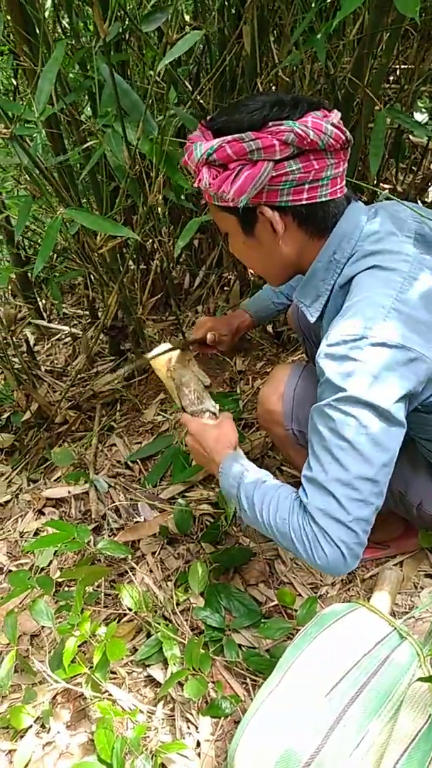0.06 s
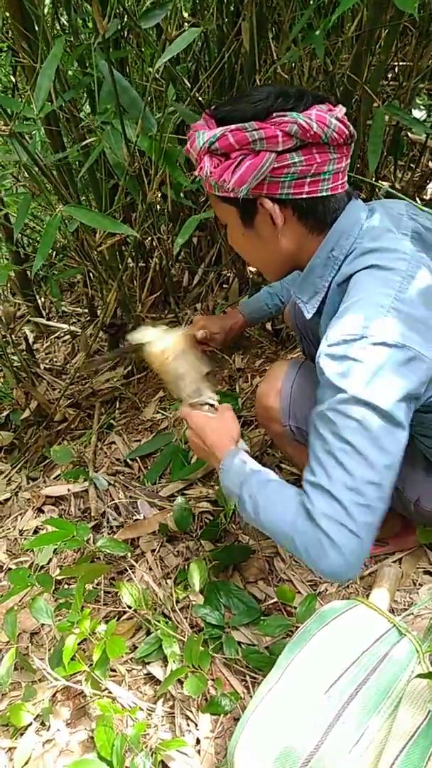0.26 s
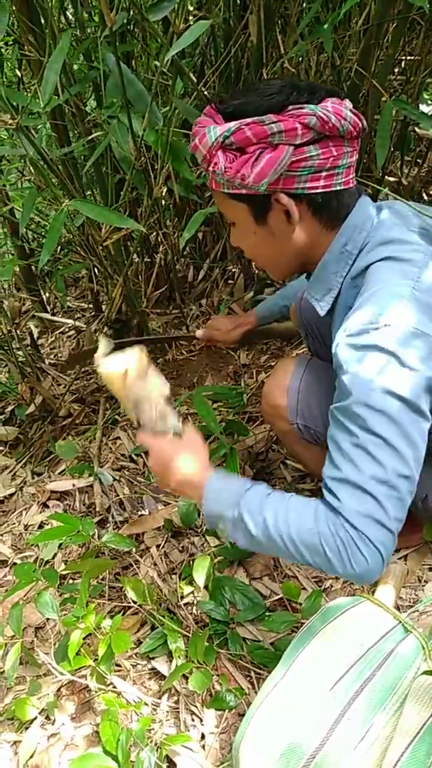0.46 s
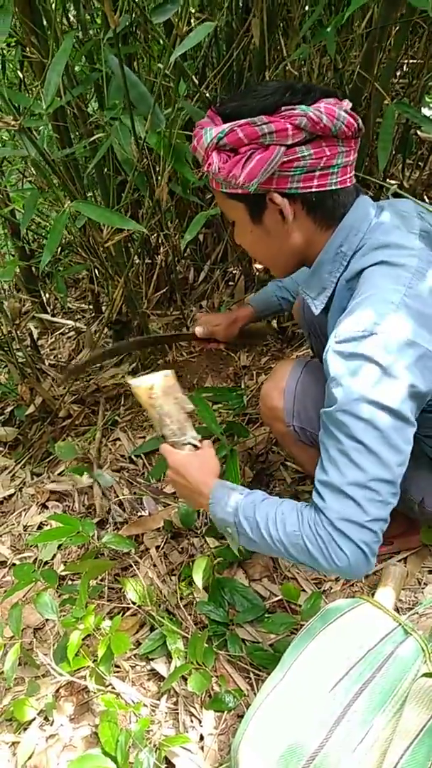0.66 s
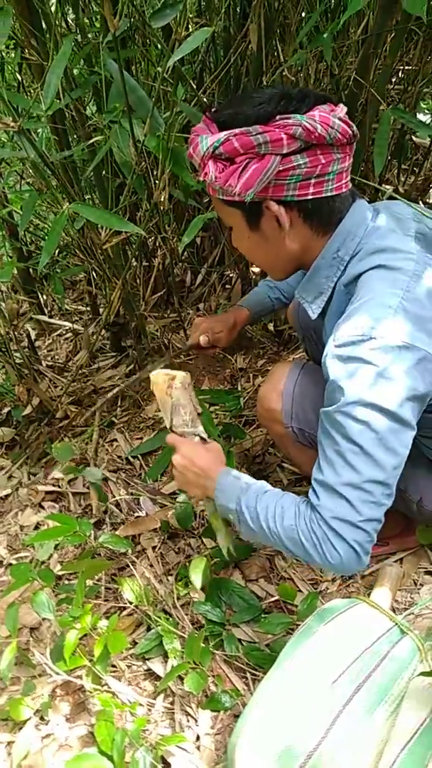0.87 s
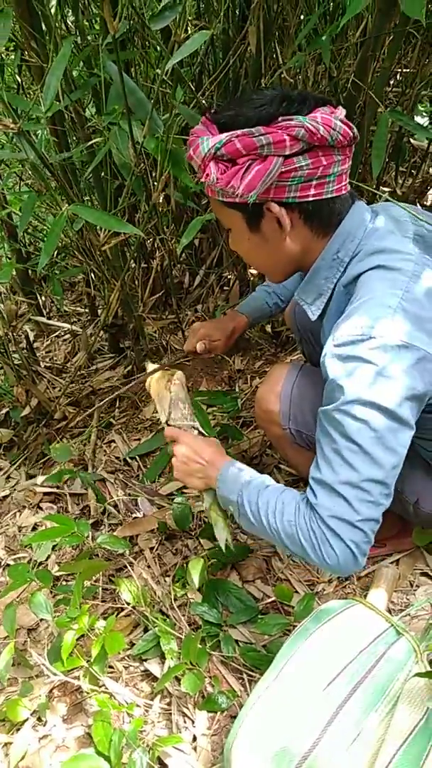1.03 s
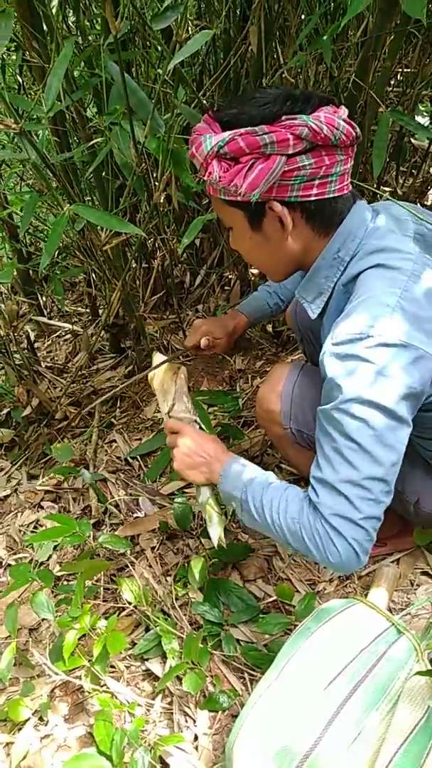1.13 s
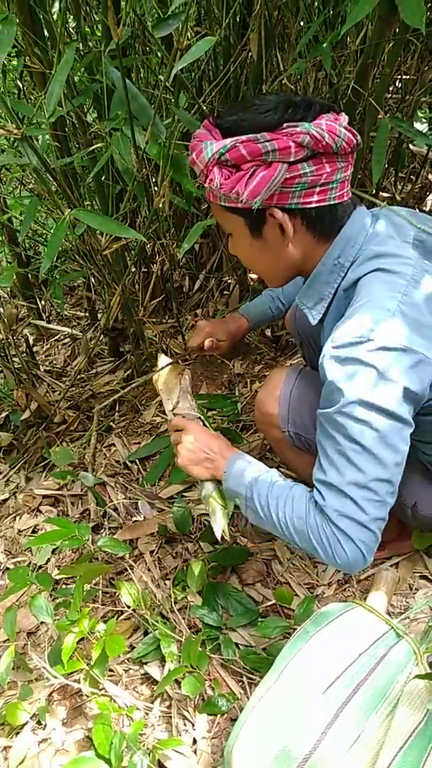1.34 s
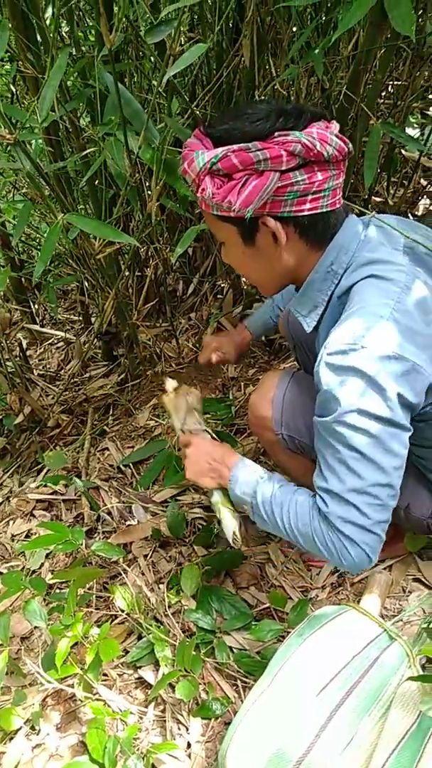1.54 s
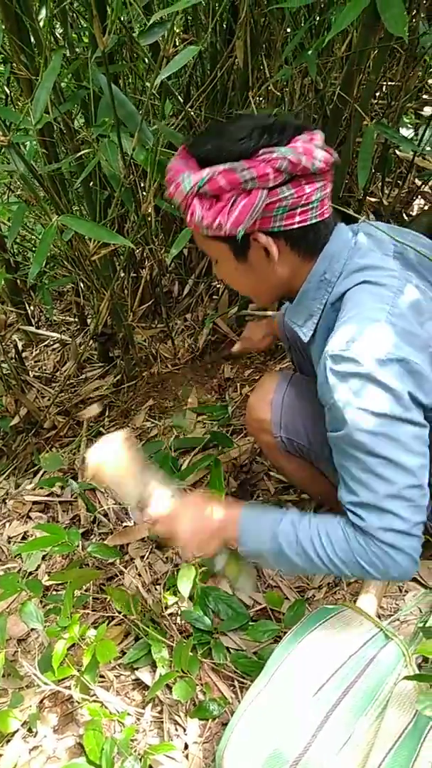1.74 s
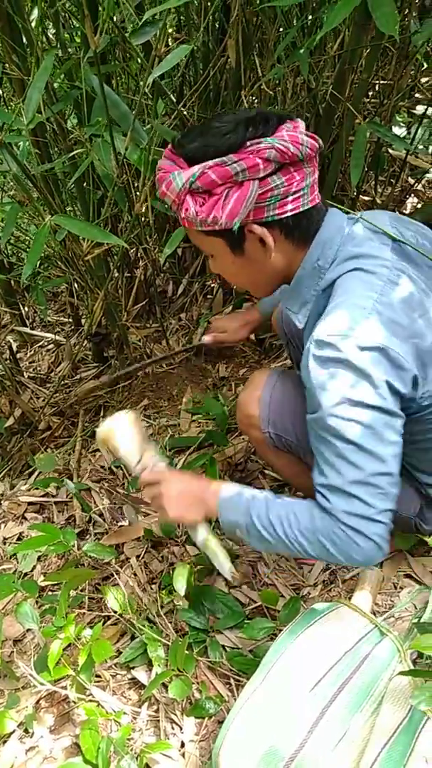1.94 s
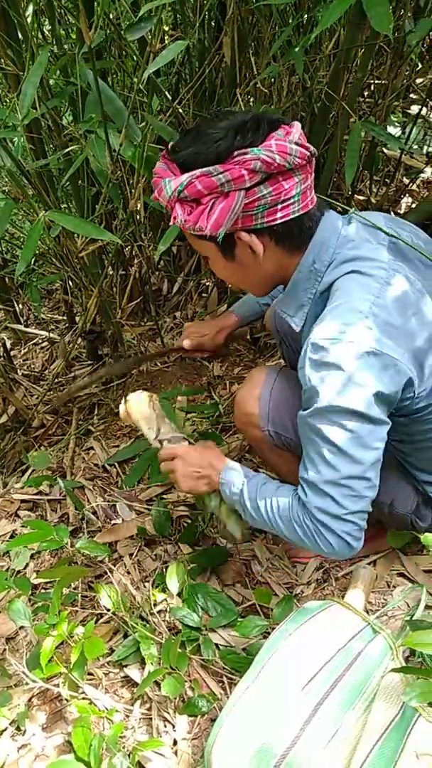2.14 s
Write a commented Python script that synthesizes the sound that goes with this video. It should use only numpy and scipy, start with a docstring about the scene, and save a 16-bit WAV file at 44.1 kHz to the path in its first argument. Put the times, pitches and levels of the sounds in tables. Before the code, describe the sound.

Bamboo sheath rips and crackles under a knife, with light scrapes and dry leaves rustling outdoors.

```python
"""A bamboo thicket, where a knife trims a young shoot: tears swell until the sheath gives way,
and the blade creaks, scrapes and clinks around them. Each stroke is a stream of snapping fibres
that rings the shoot. A cut piece drops into dry leaves, which rustle and tick. An insect trills,
briefly with a lower note; a thin whistle and two faint chirps sound. The stems scatter it all
into a short tail over a bed of soft air."""
import sys
import numpy as np
from scipy import signal
from scipy.fft import rfft, irfft
from scipy.io import wavfile
from scipy.ndimage import uniform_filter1d

SR = 44100
rng = np.random.default_rng(int(sys.argv[2]) if len(sys.argv) > 2 else 0)


def pcm_store(signal):
    """Save signal as 16-bit PCM."""
    levels = np.round(np.clip(np.atleast_2d(signal), -1, 1) * 32767)
    wavfile.write(sys.argv[1], SR, levels.astype(np.int16).T)


N = 97020
T = np.arange(N) / SR

# force of the opening slice and of each tear: time_s, level_db, tilt_db_per_octave
SLICE_FORCE = [(.144, -63, -5), (.158, -55.5, -3), (.18, -47, -3), (.21, -51, -3), (.24, -50, -3),
               (.27, -54, -4.5)]
FIRST_TEAR_FORCE = [(.24, -50.5, 1), (.27, -38, 0), (.283, -31.5, -.5), (.3, -30, 1), (.305, -38, 0.5),
                    (.318, -59.5, 1)]
LAST_TEAR_FORCE = [(1.482, -72, 0.36), (1.504, -47.5, 0.35), (1.535, -42.5, -1.4), (1.548, -62, -2.2),
                   (1.628, -66, -1.7), (1.637, -49.5, -0.13), (1.66, -39, 0.16), (1.671, -31.5, -0.027),
                   (1.674, -31, 1), (1.679, -28, 1), (1.686, -63, -0.44)]
# colour of the tearing sheath: freq_hz, gain_db
SHEATH_EQ = [(100, -73.5), (420, -23.5), (580, -44), (850, -25), (1700, -14), (2100, -7.5), (3600, -11.5),
             (5500, -13), (6200, 0.5), (7600, -1), (9000, -5), (12000, -9), (15500, -13.5)]
# ring of the shoot while whole, split and trimmed: centre_hz, width_hz, boost_db
WHOLE_RING = [(840, 56, 15), (1290, 520, 5.5), (2400, 470, 7), (4330, 400, 12)]
SPLIT_RING = [(1964, 84, 5.1), (2500, 420, 6), (4540, 230, 13.6), (7900, 120, 4.2), (9700, 65, 5.1)]
TRIMMED_RING = [(400, 350, -3.5), (1750, 84, 5), (3060, 350, 7), (4295, 300, 7.5), (7060, 900, 1),
                (8430, 720, 0.5)]

def tears(rasp_db=1.7):
    """The blade splits the sheath in rasping bunches of fibres until it gives, ringing the shoot."""
    out = 0
    cuts = (SLICE_FORCE, WHOLE_RING), (FIRST_TEAR_FORCE, SPLIT_RING), (LAST_TEAR_FORCE, TRIMMED_RING)
    for force, ring in cuts:
        fibres = snaps(per_s=4500) * unit(undb(rasp_db * wander(per_s=260)))
        out = out + colour(gesture(force, fibres), SHEATH_EQ, ring)
    return out


# blade scrapes: start_s, hold_s, level_db, tilt_db_per_octave
SCRAPE_STROKES = [(1.116, 0.018, -72, 3), (1.138, 0.025, -64.5, 3.5), (1.174, 0.023, -57.5, 0),
                  (1.251, 0.012, -59.5, 0), (1.316, 0.019, -62, 2), (1.36, 0.065, -67.5, 0),
                  (1.432, 0.021, -56.5, 0), (1.88, 0.016, -61.5, 3)]
# colour of the edge on the husk: freq_hz, gain_db
SCRAPE_EQ = [(90, -47.5), (400, -18.5), (1050, -37), (1700, -18.5), (3300, -17), (5600, -20), (6000, -8),
             (7400, 1), (8200, -11.5), (9500, -7), (15500, -21.5)]
# hollow body of the shoot: centre_hz, width_hz, boost_db
HOLLOW_RING = [(1650, 160, 8), (1990, 160, -16), (2220, 100, 23), (2680, 130, 22), (3990, 70, 19),
               (5200, 90, 19), (6950, 130, 6)]

def scrapes(catch_db=2.65):
    """The edge catches and slips on the husk and rings the hollow shoot."""
    grit = snaps(per_s=2400) * undb(catch_db * wander(per_s=180))
    return colour(strokes(SCRAPE_STROKES, grit, rise_s=.057, t60_s=.075), SCRAPE_EQ, HOLLOW_RING)


# one quiet creak and its jumps: start_s, hold_s, level_db, tilt_db_per_octave
CREAK_STROKES = [(.912, 0.1, -68, 0.5), (.913, 0.0028, -55.5, 0.5), (.937, 0.0026, -61.5, 0.5),
                 (.954, 0.0016, -56, 4)]
# colour of the creak: freq_hz, gain_db
CREAK_EQ = [(1700, -43), (2300, -20.5), (5600, -9.5), (6000, 6), (7700, 0.5), (10000, -25.5)]
# ring of the pinched husk: centre_hz, width_hz, boost_db
HUSK_RING = [(2380, 240, 25), (3220, 130, 15), (3880, 130, 12), (4860, 100, 15), (6230, 100, 6)]

def creak():
    """The wedged blade sticks and jumps three times in the husk."""
    slips = strokes(CREAK_STROKES, snaps(per_s=2400), rise_s=.044, t60_s=.075)
    return colour(slips, CREAK_EQ, HUSK_RING)


# light touches of the blade: start_s, level_db
BLADE_TOUCHES = [(0.0889, -55), (1.909, -52), (2.195, -55)]
# ring of the blade: centre_hz, width_hz, boost_db
BLADE_RING = [(2400, 380, 25), (4050, 160, 19), (9700, 300, 3)]

def clinks():
    """The blade touches the shoot, cushioned by the husk, and rings briefly, damped by the hand."""
    contact = snaps(per_s=4500) * sum(undb(db) * fade(T - s, t60_s=.044) for s, db in BLADE_TOUCHES)
    return colour(tilted(contact, db_per_octave=-3.5), SCRAPE_EQ, BLADE_RING)


# single fibres and twigs breaking: start_s, level_db, tilt_db_per_octave
CRACK_HITS = [(0.7389, -42, 2.5), (0.812, -52, -6), (1.434, -59, 12.5), (1.451, -65, 13),
              (1.597, -48, -2.5), (1.748, -36, -3.5), (1.778, -39.5, 2), (1.824, -51, -1), (1.84, -60, 0),
              (2.024, -45.5, 3.5)]

def cracks():
    """Tough fibres and twigs crack in lone sharp bursts that ring the trimmed shoot."""
    envelopes = np.array([undb(db) * fade(T - s, t60_s=.022) for s, db, _ in CRACK_HITS])
    level = envelopes.sum(0)
    tilt = np.array(CRACK_HITS)[:, 2] @ envelopes / (level + 1e-20)
    return colour(tilted(rng.standard_normal(N) * level, tilt), SHEATH_EQ, TRIMMED_RING)


# crunch of the landing: time_s, level_db, tilt_db_per_octave
LANDING_FORCE = [(.694, -62, 2.5), (.722, -50, 2), (.738, -49, -4.5), (.752, -44.5, -1), (.765, -54, 2),
                 (.8, -58.5, -1)]
# thuds on the soil: start_s, level_db, t60_s
SOIL_THUDS = [(0.739, -54.5, 0.17), (.81, -67, 0.051)]
# colours of leaf litter and soil: freq_hz, gain_db
LITTER_EQ = [(130, -50), (400, -0.5), (600, -12), (1000, -8.5), (2600, 3), (5400, 1), (6200, 5),
             (15500, -9.5)]
SOIL_EQ = [(100, -43), (230, -10), (430, -4.5), (560, -10), (1200, -21)]

def falling_piece():
    """The offcut crushes leaves, thuds on the soil and tumbles."""
    crunch = colour(gesture(LANDING_FORCE, snaps(per_s=1300)), LITTER_EQ)
    thuds = sum(undb(db) * fade(T - s, t60_s) for s, db, t60_s in SOIL_THUDS)
    return crunch + colour(thuds * snaps(per_s=3100), SOIL_EQ)


# leaves disturbed: start_s, hold_s, level_db, tilt_db_per_octave
LEAF_RUSTLES = [(.365, 0.057, -70, 0), (.5, 0.0056, -74, 7), (.76, 0.077, -60, 1.5),
                (1.76, 0.032, -55, -1.5), (1.824, 0.023, -58, -0.5), (2.007, 0.023, -56.5, -1),
                (2.025, 0.024, -57, 4.5), (2.08, 0.034, -64, 5.5), (2.155, 0.051, -71, 7)]
# colour of dry leaves: freq_hz, gain_db
LEAF_EQ = [(200, -38), (900, -40), (1800, -12.5), (2400, -6.5), (2900, -11.5), (4100, -5.5), (5300, -10),
           (6100, -5.5), (7400, -3), (9000, -10), (11000, -13), (15500, -36.5)]

def leaves(flutter_db=2):
    """Dry leaves crackle as they shift."""
    crackle = snaps(per_s=2600) * undb(flutter_db * wander(per_s=90))
    return colour(strokes(LEAF_RUSTLES, crackle, rise_s=.098, t60_s=.13), LEAF_EQ)


# swell of the trill: time_s, level_db
TRILL_LEVEL = [(0.06, -100), (0.079, -80), (.11, -88), (0.453, -70), (0.504, -85.5), (0.554, -66),
               (0.619, -80), (0.982, -69.5), (1.05, -75), (1.099, -68.5), (1.35, -67), (2.19, -74.5)]

def insect(waver_hz=54, throb_hz=52):
    """An insect holds a high, wavering trill with an uneven throb."""
    time_s, level_db = np.array(TRILL_LEVEL).T
    pitch_hz = np.linspace(8590, 8610, N) + waver_hz * wander(per_s=490)
    throb = np.abs(1 + .5 * tone(throb_hz * (1 + .35 * wander(per_s=17))))
    return undb(np.interp(T, time_s, level_db)) * unit(throb) * tone(pitch_hz)


# whistle, insect's lower note, two chirps: start_s, length_s, start_hz, end_hz, level_db
FAINT_NOTES = [(.56, .14, 14250, 13800, -77), (.5, .24, 4340, 4320, -79), (2.115, .055, 2630, 2650, -62),
               (2.172, .04, 2680, 2640, -64)]

def faint_notes(waver_hz=70, hoarse_db=3):
    """A thin, very high falling whistle, the insect's note an octave below its trill, two chirps."""
    waver = waver_hz * wander(per_s=500)
    hoarse = unit(undb(hoarse_db * wander(per_s=180)))
    out = 0
    for start_s, length_s, start_hz, end_hz, level_db in FAINT_NOTES:
        progress = np.clip((T - start_s) / length_s, 0, 1)
        pitch_hz = start_hz + (end_hz - start_hz) * progress + waver
        out = out + undb(level_db) * np.sin(np.pi * progress) * hoarse * tone(pitch_hz)
    return out


# colour of the scatter off the stems: freq_hz, gain_db
THICKET_EQ = [(200, -12.5), (1000, 5.5), (2400, 0), (6500, 3.5), (15000, -0.5)]

def thicket(x, wet_db=-12, predelay_s=.0022):
    """Countless stems throw back a short, bright tail."""
    tail = colour(rng.standard_normal(N), THICKET_EQ) * fade(T - predelay_s, t60_s=.31)
    return undb(wet_db) * signal.fftconvolve(x, tail / np.linalg.norm(tail))[:N]


# colour of the air bed: freq_hz, gain_db
AIR_EQ = [(25, -7), (60, 1.5), (400, 2), (1000, -6), (3300, -8), (7000, -5.5), (16000, -17)]

def air(level_db=-84.5, drift_db=.7):
    """Still forest air: a faint hush whose level drifts."""
    return undb(level_db + drift_db * wander(per_s=8.7)) * colour(rng.standard_normal(N), AIR_EQ)


def snaps(per_s, spread_db=2.5, smear_db=-5, size=700):
    """Fibres break at random moments with uneven strength, each smeared by hand, blade and ground."""
    clicks = (rng.random(N) < per_s / SR) * undb(spread_db * rng.standard_normal(N))
    clicks *= rng.choice([-1, 1], N)
    smear = rng.standard_normal(size) * fade(T[:size], t60_s=.012)
    smear *= undb(smear_db) / np.linalg.norm(smear)
    smear[0] = 1  # the direct snap
    stream = signal.fftconvolve(clicks, smear)[:N]
    local_power = np.abs(uniform_filter1d(stream ** 2, size // 2))
    return stream / np.sqrt(local_power + 1e-6)


def gesture(force, fibres):
    """Ride the level and brightness of a stream of snaps along one curve of force."""
    time_s, level_db, tilt = np.array(force).T
    envelope = undb(np.interp(T, time_s, level_db)) * (T > time_s[0]) * (T < time_s[-1])
    return tilted(fibres * envelope, np.interp(T, time_s, tilt))


def strokes(rows, fibres, rise_s, t60_s):
    """Short strokes that climb 60 dB in rise_s, hold and release, each with its own brightness."""
    powers = []
    for start_s, hold_s, level_db, _ in rows:
        attack = fade(np.maximum(start_s - T, 0), rise_s)
        release = fade(np.maximum(T - start_s - hold_s, 0), t60_s)
        powers.append((undb(level_db) * attack * release) ** 2)
    total = sum(powers)
    tilt = np.array(rows)[:, 3] @ np.array(powers) / (total + 1e-20)
    return tilted(fibres * np.sqrt(total), tilt)


def colour(x, eq, resonances=(), size=4096):
    """Causal filter of unit energy from a broad EQ curve and narrow peaks or dips."""
    freq_hz = np.fft.rfftfreq(size, 1 / SR)
    eq_hz, eq_db = np.array(eq, float).T
    gain = undb(np.interp(np.log(freq_hz + 1), np.log(eq_hz), eq_db))
    for centre_hz, width_hz, boost_db in resonances:
        gain *= 1 + (undb(boost_db) - 1) / (1 + (2 * (freq_hz - centre_hz) / width_hz) ** 2)
    # minimum phase: the ring follows the hit
    cepstrum = irfft(np.log(unit(gain)))
    cepstrum[1:size // 2] *= 2
    cepstrum[size // 2 + 1:] = 0
    return signal.fftconvolve(x, irfft(np.exp(rfft(cepstrum))))[:N]


def tilted(x, db_per_octave, pivot_hz=6000):
    """Brighten or darken by a slope that may move, over two octaves each side of the pivot."""
    octave = np.clip(np.log2((np.fft.rfftfreq(N, 1 / SR) + 1) / pivot_hz), -2, 2)
    spectrum = rfft(x)
    bands = {k: irfft(spectrum * np.maximum(1 - abs(octave - k), 0), N) for k in range(-2, 3)}
    return sum(band * undb(db_per_octave * k) for k, band in bands.items())


def tone(pitch_hz):
    """A sine of rms 1 that follows a pitch."""
    return np.sqrt(2) * np.sin(2 * np.pi * np.cumsum(pitch_hz) / SR)


def wander(per_s):
    """Smooth random drift of rms 1."""
    knots = rng.standard_normal(4096)
    return unit(np.interp(T * per_s, np.arange(len(knots)), knots))


def fade(t, t60_s):
    """Exponential decay from time zero, silence before it."""
    return (t >= 0) * np.exp(-np.log(1000) * np.maximum(t, 0) / t60_s)


def undb(db):
    """Decibels to gain."""
    return 10 ** (np.asarray(db) / 20)


def unit(x):
    """Scale to rms 1."""
    return x / np.sqrt(np.mean(x ** 2) + 1e-20)


def scene():
    """Knife work, litter, an insect and faint notes in still forest air."""
    bed = air()
    knife = tears() + scrapes() + creak() + clinks()
    litter = leaves() + cracks() + falling_piece()
    direct = knife + litter + insect() + faint_notes()
    return (direct + thicket(direct) + bed)[None]


def record(dry):
    """A steep low-pass cuts the top above 15.8 kHz."""
    return signal.sosfilt(signal.ellip(10, .2, 80, 15800, fs=SR, output="sos"), dry)


dry = scene()
out = record(dry)
pcm_store(out)
```